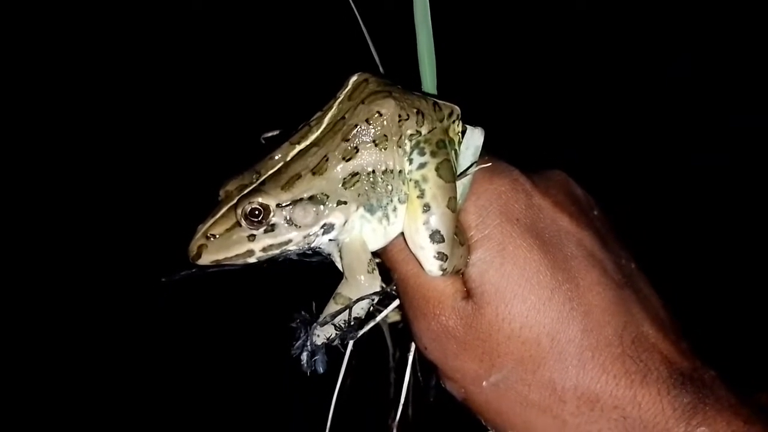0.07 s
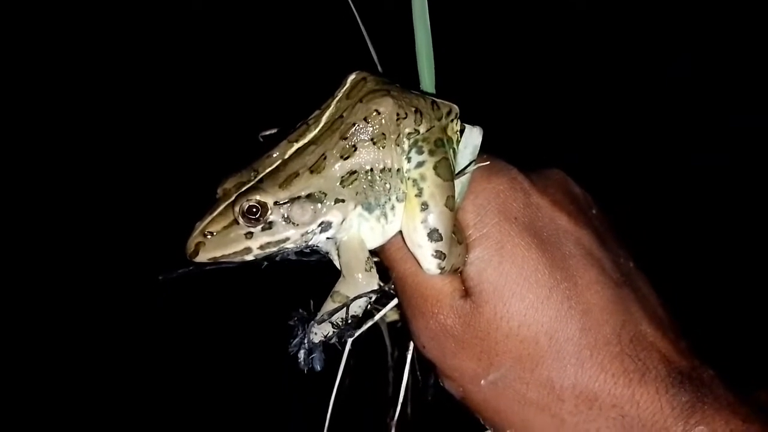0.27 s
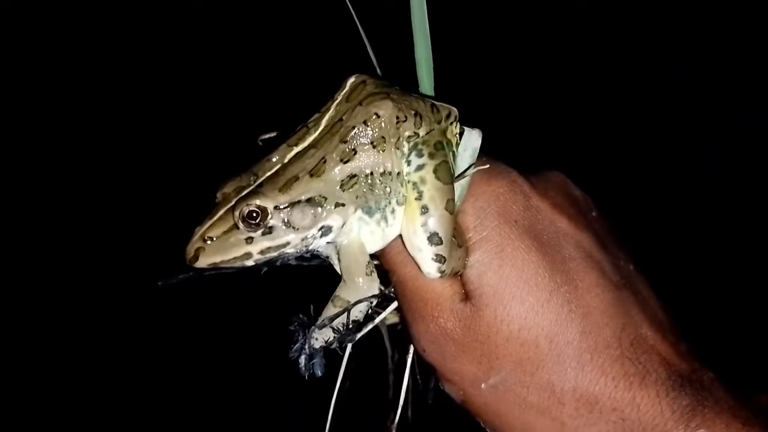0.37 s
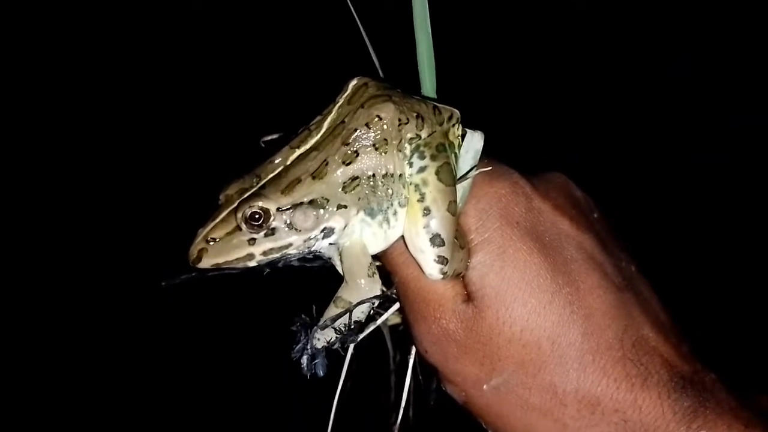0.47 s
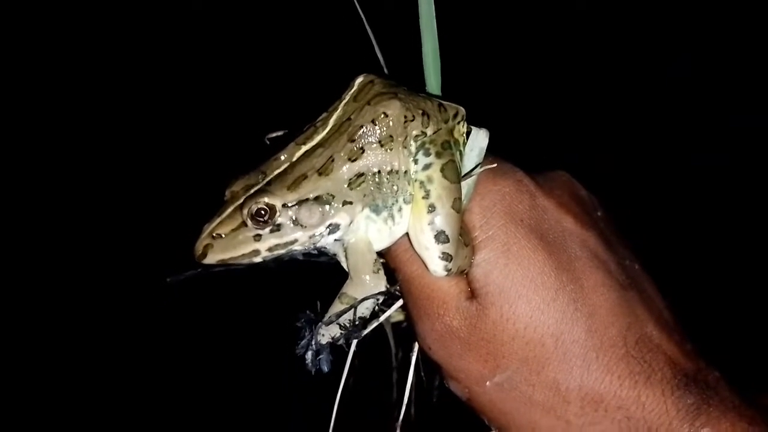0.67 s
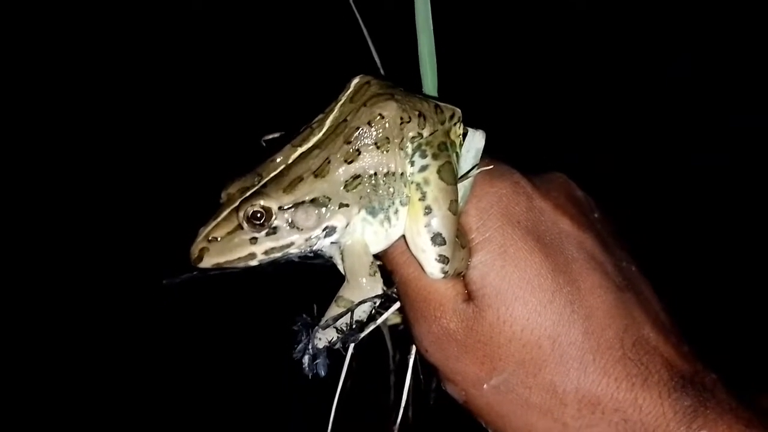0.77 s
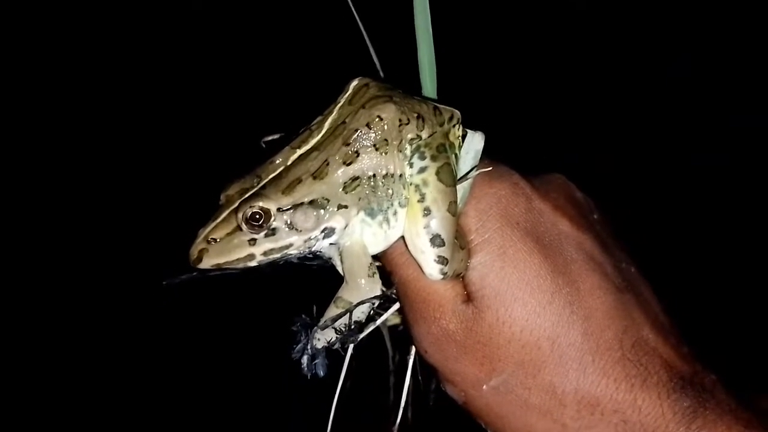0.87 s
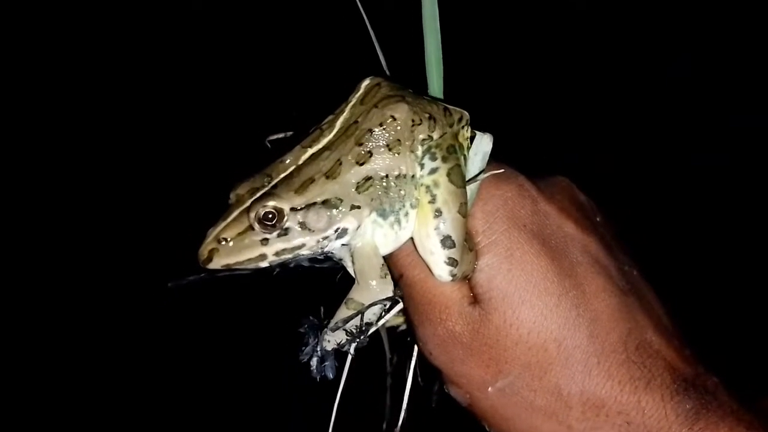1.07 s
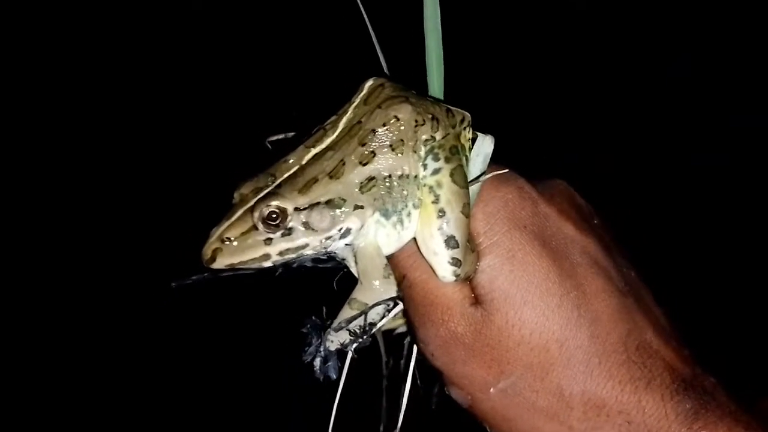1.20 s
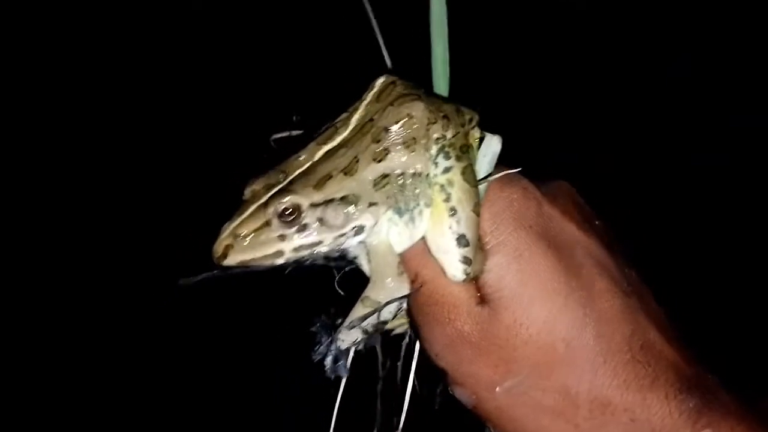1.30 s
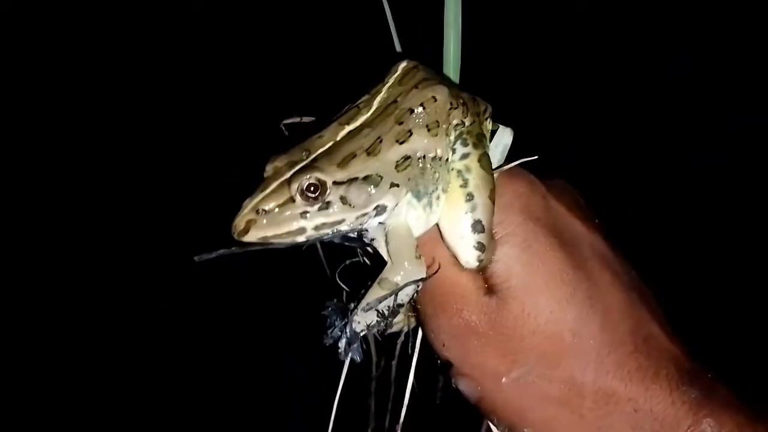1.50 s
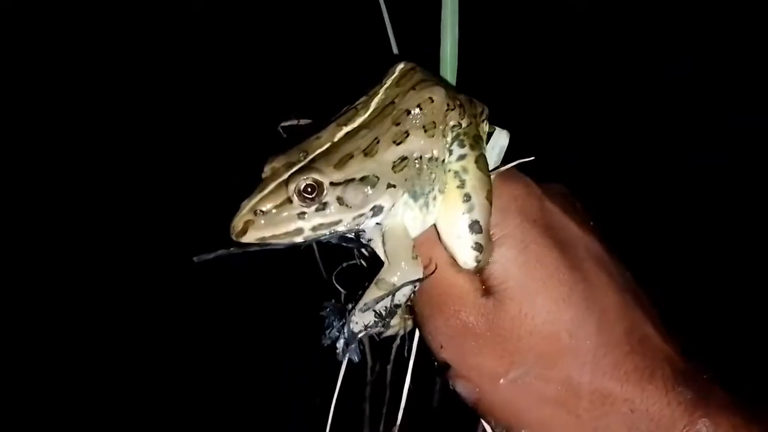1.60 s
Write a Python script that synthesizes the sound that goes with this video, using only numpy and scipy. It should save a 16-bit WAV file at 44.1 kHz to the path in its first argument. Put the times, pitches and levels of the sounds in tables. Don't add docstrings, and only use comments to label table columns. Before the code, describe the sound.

A frog held in a hand screams twice, very close: slow ticks quicken into a rasping, piercing wail, then sag and cut off. A faint cricket trill and soft hiss fill the quiet night outdoors.

```python
import sys
import numpy as np
from scipy import signal
from scipy.fft import rfft, irfft, next_fast_len
from scipy.io import wavfile
from scipy.ndimage import uniform_filter1d

SR = 44100
rng = np.random.default_rng(int(sys.argv[2]) if len(sys.argv) > 2 else 0)


def output_pcm(signal):
    pcm = np.clip(np.atleast_2d(signal).T, -1, 1) * 32767
    wavfile.write(sys.argv[1], SR, np.round(pcm).astype(np.int16))


def boost(x):
    u = np.asarray(x, float) / 20
    return 10 ** u


N = 72765


def unit(x):
    return x / np.sqrt(np.mean(x ** 2) + 1e-20)


def read(rows, s):
    at, *columns = np.transpose(rows)
    return [np.interp(s, at, column) for column in columns]


def filtered(x, response):
    m = next_fast_len(N + 8192)
    spectrum = rfft(x, m) * response(np.fft.rfftfreq(m, 1 / SR))
    return irfft(spectrum, m)[..., :N]


def high_pass(x, hz):
    return filtered(x, lambda f: (1j * f / (hz + 1j * f)) ** 2)


def low_passed_noise(hz):
    return unit(filtered(rng.standard_normal(N), lambda f: 1 / (1 + (f / hz) ** 2)))


def placed(starts, shape, size):
    index = np.ceil(starts * SR).astype(int)[:, None] + np.arange(size)
    values = shape(index / SR - starts[:, None])
    return np.bincount(index.ravel() + SR, values.ravel(), N + SR)[SR:SR + N]


def ring(t, hz, width):
    rise_s = 0.00019
    decay = np.sqrt(4 * np.pi * width) * np.exp(-np.pi * width * t)
    return decay * np.sin(2 * np.pi * hz * t) * (1 - np.exp(-t / rise_s))


def modes(t, table, damping=1):
    return sum((-1) ** k * boost(db) * ring(t, hz, width * damping) for k, (hz, width, db) in enumerate(table))


def folds(ticks, rates):
    round_s = 0.033
    t = np.arange(rates[0][0], rates[-1][0], 1 / SR)
    rate = uniform_filter1d(read(rates, t)[0], int(round_s * SR), mode="nearest")
    turns = np.cumsum(rate) / SR
    train = np.interp(np.arange(int(turns[-1]) + 1), turns, t)
    return np.concatenate([ticks, train])


def hand_notches(f):
    # f/Hz, width/Hz, depth (0-1)
    notches = [(597.96, 130, 0.1), (860, 110, 0.3), (1410, 190, .95), (1991.5, 50, 0.2), (2526, 50, 0.5),
               (2837.4, 150, 0.7), (3648.6, 220, 0.4), (6685, 300, .6), (7750, 240, .8), (9335, 610, 1),
               (10534, 970, .9)]
    response = 1
    for hz, width, depth in notches:
        band = 1j * f * width
        response = response * (1 - np.clip(depth, 0, 1) * band / (hz * hz - f * f + band))
    return response


def cry(ticks, rates, mouth, throat, chest):
    # f/Hz, width/Hz, level/dB
    cavity = [(5199.5, 500, -10), (6016, 130, -0.5)]
    # f/Hz, width/Hz, level/dB
    head = [(2430, 660, -18), (3200, 100, 0.5), (7049, 400, -11.5), (8260, 180, -14), (9430, 600, -44),
            (9260, 290, -17.5), (11200, 700, -20), (14200, 570, -40.5)]
    # f/Hz, width/Hz, level/dB
    skin = [(691, 220, -4.4), (1083.3, 320, 1.5), (1505.6, 180, -2)]
    tick_hz = 3352
    jitter, spent_jitter = .002, .09
    scatter_db, skin_scatter_db, breath_db = .18, 1.6, -40
    taut_hz, slackest, slack_grows = 700, 2.2, 1.6
    shut_width_hz, sheen_db_per_octave, mouth_low_hz = 250, 11.5, 1200

    at, opening_db = np.transpose(ticks)
    s = folds(at, rates)
    period = np.gradient(s)
    chance = rng.standard_normal((len(s), 3))
    slack = np.clip(period * taut_hz, 1, slackest) ** slack_grows
    sag_start_s = rates[-3][0]
    s = s + np.where(s > sag_start_s, spent_jitter, jitter * slack) * period * chance[:, 0]
    size = (np.sqrt(period) * boost(scatter_db * slack * chance[:, 1]))[:, None]

    level_db, hz, width, cavity_db = [c[:, None] for c in read(mouth, s)]
    level_db[:len(at), 0] += opening_db
    hz[:len(at)] = tick_hz
    skin_db, skull_db = [c[:, None] for c in read(throat, s)]
    chest_db = read(chest, s)[0][:, None]
    shut = np.maximum(1, width / shut_width_hz)
    sheen = boost(-sheen_db_per_octave * np.log2(np.clip(period * taut_hz, 1, 4)))[:, None]
    drift = unit(uniform_filter1d(chance[:, 2], size=4))
    skin_db = skin_db + skin_scatter_db * ((slack - 1) * drift)[:, None]

    def mouth_and_skull(t):
        from_mouth = boost(level_db) * (ring(t, hz, width) + boost(cavity_db) * modes(t, cavity, shut))
        skull = modes(t, head[:2], shut) + np.minimum(1, sheen * shut) * modes(t, head[2:])
        return size * (from_mouth - boost(skull_db) * skull)

    def skin_and_chest(t):
        chest_hum = ring(t, 430, 300)
        return size * (boost(skin_db) * modes(t, skin) + boost(chest_db) * chest_hum)

    pulses = high_pass(placed(s, mouth_and_skull, size=440), mouth_low_hz)
    pulses += placed(s, skin_and_chest, size=440)
    breath = boost(breath_db) * np.interp(np.arange(N) / SR, s, slack) * low_passed_noise(1500)
    return filtered(pulses * (1 + breath), hand_notches)


def whimper():
    # t/s, f/Hz, level/dB
    whimper_glide = [
        (0.585, 701, -69),
        (0.607, 691.2, -73),
        (0.649, 622.8, -69),
        (0.679, 612, -57.5),
        (0.707, 504, -84),
        (0.715, 516, -89),
    ]
    octave_db = -18
    t = np.arange(N) / SR
    hz, db = read(whimper_glide, t)
    turn = 2 * np.pi * np.cumsum(hz) / SR
    inside = (t > whimper_glide[0][0]) & (t < whimper_glide[-1][0])
    tone = np.sin(turn) + boost(octave_db) * np.sin(2 * turn)
    return inside * np.sqrt(2) * boost(db) * tone


def frog():
    # t/s, mouth opening level/dB
    ticks = [
        [(.001, -46), (.0265, -39), (.0447, -33), (.0645, -1)],
        [(.998, -36), (1.0185, -37.5), (1.043, -4.5)],
    ]
    # t/s, rate/Hz
    wail = [
        [(.0853, 46.5), (.122, 106), (.18, 186.5), (.228, 317), (.295, 420), (.33, 430.2), (.39, 633.2),
         (.452, 800), (.5, 673.9)],
        [(1.066, 43.03), (1.095, 92), (1.16, 150.3), (1.2, 220), (1.262, 291.7), (1.31, 377.2), (1.34, 484.7),
         (1.386, 697.1), (1.405, 650)],
    ]
    # t/s, rate/Hz
    sag = [
        [(.533, 490), (.544, 280), (.563, 160)],
        [(1.44, 570), (1.462, 260), (1.487, 200)],
    ]
    # t/s, level/dB, resonance f/Hz, width/Hz, upper cavity relative level/dB
    mouth = [
        [(.066, -52, 3170, 250, -19.5), (.084, -51, 4130, 250, -45), (.22, -20.5, 4065, 220, -28),
         (.3, -18.5, 4750, 600, -8.5), (.432, -7.5, 4364, 350, -20.5), (.46, -7, 4217, 600, -30.5),
         (.494, -12.5, 3465, 304, -36), (.506, -47.5, 3300, 1200, 0.5), (.56, -72, 3047, 1500, 3)],
        [(1.066, -49.5, 3900, 400, -19.5), (1.14, -45, 2620, 183, -25), (1.18, -36, 2716, 222, -26.5),
         (1.215, -26.5, 4035, 250, -44.5), (1.29, -17, 4484, 600, -16.5), (1.365, -8.5, 3963, 350, -44),
         (1.396, -11, 3328, 300, -27), (1.41, -52.5, 3200, 1200, 10.5), (1.485, -69.5, 3020, 1500, 4)],
    ]
    # t/s, skin level/dB, skull level/dB
    throat = [
        [(0, -79, -103.5), (.08, -68, -71.5), (.22, -57.5, -41), (.36, -50, -29.5), (.45, -37, -23),
         (.495, -41.5, -30), (.51, -39.5, -51), (.553, -51, -68), (.565, -77.5, -78)],
        [(.99, -85.5, -100.5), (1.06, -74.5, -72.5), (1.2, -62, -51), (1.32, -57, -54.5), (1.36, -41, -50.5),
         (1.395, -53, -27), (1.415, -38.5, -53.5), (1.474, -54, -72), (1.49, -63, -84)],
    ]
    # t/s, level/dB
    chest = [
        [(.44, -84), (.5, -56.5), (.532, -45), (.55, -64.5)],
        [(1.37, -88), (1.43, -45), (1.455, -51.5), (1.475, -68)],
    ]
    screams = sum(cry(ticks[k], wail[k] + sag[k], mouth[k], throat[k], chest[k]) for k in range(2))
    return screams + whimper()


def surroundings(x):
    # delay t/s, level/dB
    echoes = [(.00035, -40.5), (.0011, -31.5), (.0031, -17)]
    scatter_db, scatter_t60 = -28, .11
    near = filtered(x, lambda f: 1 + sum(boost(db) * np.exp(-2j * np.pi * f * s) for s, db in echoes))
    t = np.arange(SR // 4) / SR
    tail = rng.standard_normal(len(t)) * boost(-60 * t / scatter_t60)
    return near + boost(scatter_db) * signal.fftconvolve(x, tail / np.linalg.norm(tail))[:N]


def snaps():
    # t/s, peak level/dB, dull above f/Hz
    snap_events = [
        (.146, -50, 14800),
        (0.1854, -27, 14100),
        (.1935, -38.5, 14900),
        (1.105, -32, 7500),
        (1.26, -15.5, 6130),
        (1.284, -18.5, 6340),
    ]
    t60, low_hz, wide = 0.0061, 5470, 0.68

    def cracks():
        total = np.zeros(N)
        for s, db, dull_hz in snap_events:
            burst = placed(np.array([s]), lambda t: boost(db - 60 * t / t60) * rng.standard_normal(t.shape), size=300)
            total += filtered(burst, lambda f: 1 / (1 + (f / dull_hz) ** 8))
        return high_pass(total, low_hz)

    mid, side = cracks(), cracks()
    return np.array([mid + wide * side, mid - wide * side])


def chirps(starts, db, hz, fall, length, bend, octave_db):
    def stroke(t):
        u = np.clip(t / length, 0, 1)
        dropped = fall * length * u ** (bend + 1) / (bend + 1)
        turn = 2 * np.pi * (hz * (t - dropped) + rng.random((len(starts), 1)))
        tone = np.sin(turn) + boost(octave_db) * np.sin(2 * turn)
        return boost(db)[:, None] * np.sin(np.pi * u ** .7) * tone
    return placed(starts, stroke, size=1100)


def near_cricket():
    strokes, first_s, period_s, slip_s = 78, .0048, .021094, .0005
    hz, level_db, scatter_db, opening_db, flutter_db = 7146.6, -57, 1.6, -9.5, 1.5
    s = first_s + period_s * np.arange(strokes) + rng.normal(0, slip_s, strokes)
    db = level_db + rng.normal(0, scatter_db, strokes)
    trill = chirps(s - .0045, db, hz, fall=.13, length=.015, bend=5, octave_db=-26)
    trill += chirps(s + 0.0095, db + opening_db, hz, fall=0.027, length=0.018, bend=0.92, octave_db=-34)
    return trill * boost(flutter_db * low_passed_noise(300))


def far_cricket():
    # t/s, level/dB
    far_strokes = [(.075, -100), (.61, -89), (.765, -83.5), (.84, -82), (.885, -78), (1.5, -82),
                   (1.555, -76.5), (1.595, -89), (1.635, -77.5)]
    at, db = np.transpose(far_strokes)
    return chirps(at, db, hz=5000, fall=.14, length=.02, bend=1, octave_db=-60)


def night():
    # f/Hz, density level/dB
    hiss_colour = [(25, -10), (120, -49), (280, -15.5), (700, -21), (2000, -35.5), (5600, -29),
                   (9000, -34.5), (14000, -20.5)]
    level_db, side_db, side_low_hz = -67, -46.5, 5014
    f, db = np.transpose(hiss_colour)
    noise = rng.standard_normal((2, N))
    mid, side = filtered(noise, lambda hz: boost(np.interp(np.log(hz + 1), np.log(f + 1), db)))
    side = boost(side_db) * high_pass(side, side_low_hz)
    return boost(level_db) * np.array([mid + side, mid - side]) / np.std(mid)


def scene():
    low_cut_hz = 250
    close = high_pass(high_pass(surroundings(frog()), low_cut_hz), low_cut_hz)
    return close + near_cricket() + far_cricket() + snaps() + night()


def band_limit(x):
    return signal.sosfilt(signal.butter(12, 15750, fs=SR, output="sos"), x)


def record(dry):
    return band_limit(dry)


dry = scene()
out = record(dry)
output_pcm(out)
```